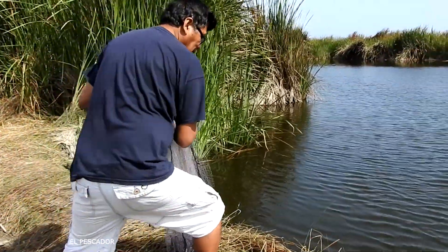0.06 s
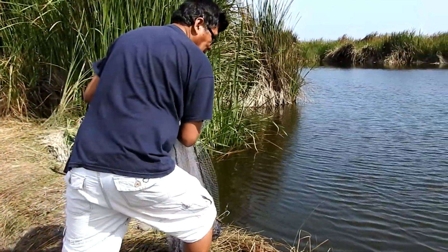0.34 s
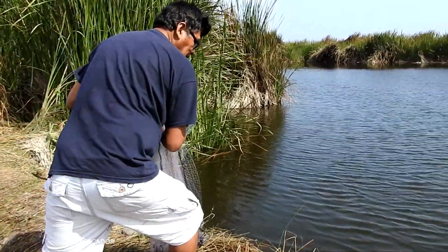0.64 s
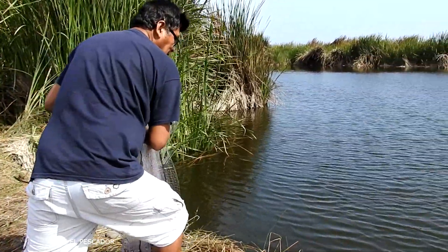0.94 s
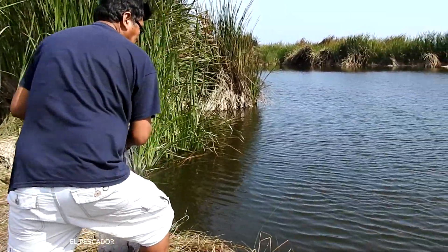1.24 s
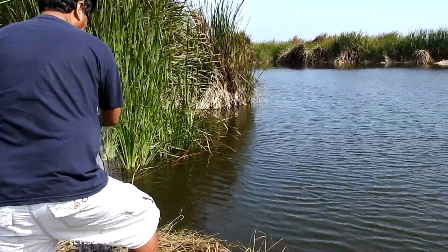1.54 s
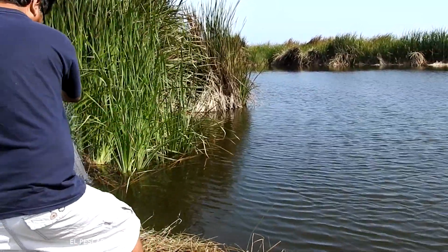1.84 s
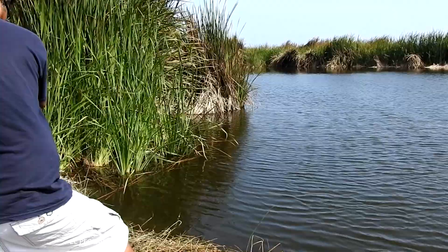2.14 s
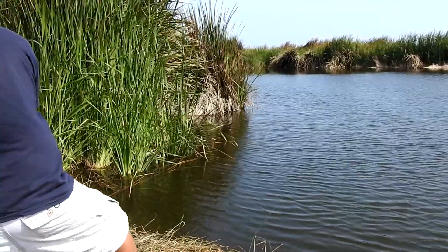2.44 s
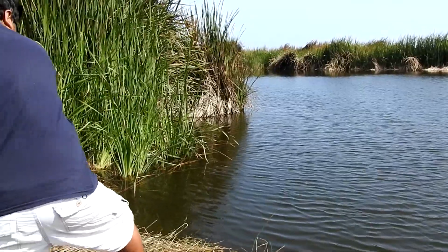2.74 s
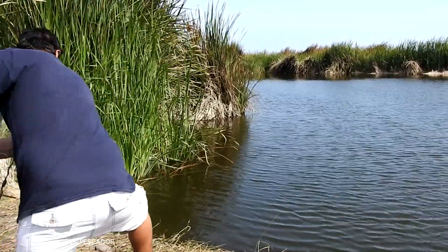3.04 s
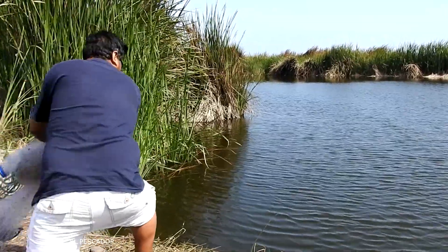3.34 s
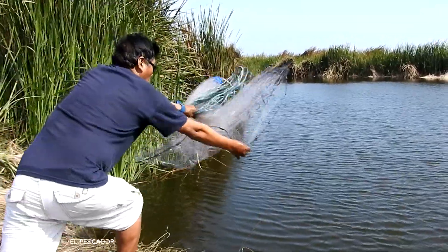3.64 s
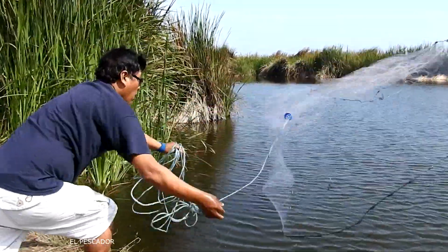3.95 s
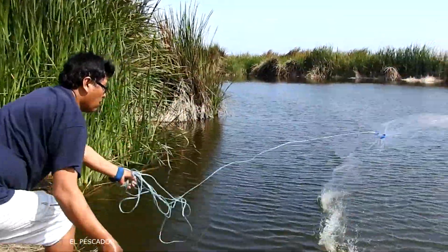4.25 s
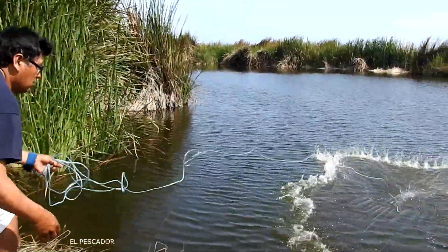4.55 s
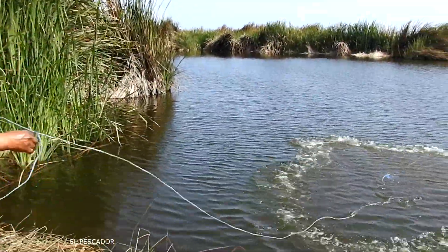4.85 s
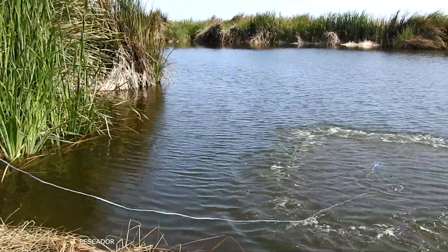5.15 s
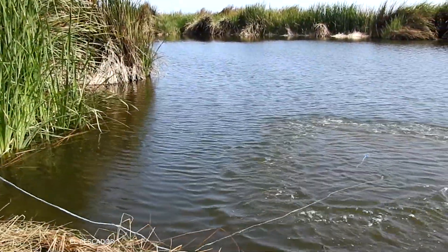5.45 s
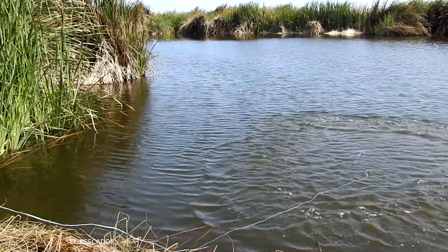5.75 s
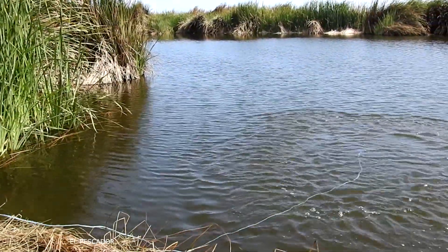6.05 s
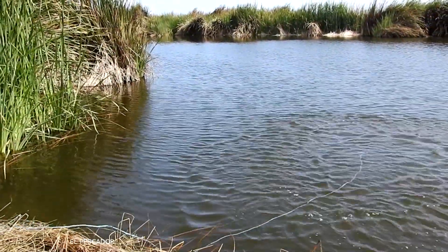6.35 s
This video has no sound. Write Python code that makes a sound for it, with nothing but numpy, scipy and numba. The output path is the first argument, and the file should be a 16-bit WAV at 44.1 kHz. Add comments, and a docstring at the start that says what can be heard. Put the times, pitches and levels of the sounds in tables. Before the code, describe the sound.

Soft wind and ripples outdoors, then a thrown fishing net hisses and hits the water with one broad, bubbling splash.

```python
"""On a reedy lagoon bank a fisherman shifts his feet in dry grass; lead sinkers knock together.
Near 3.4 s he swings a cast net, cloth rubbing, and the mesh hisses through the air.
From 4.3 s the ring of sinkers tears into the water, air cavities plop and gurgle, spray rains back.
Foam fizzes out and his feet scuff again. Throughout, reeds rustle, ripples murmur
and gusts rumble on the two microphone ports."""
import sys
import numpy as np
from scipy import signal
from scipy.fft import rfft, irfft, next_fast_len
from scipy.io import wavfile
from scipy.ndimage import uniform_filter1d, map_coordinates
from numba import njit

SR = 44100
rng = np.random.default_rng(int(sys.argv[2]) if len(sys.argv) > 2 else 0)


def master_out(mix):
    """Clip the mix to full scale and print it as 16-bit PCM to the path in sys.argv[1]."""
    frames = np.transpose(np.atleast_2d(mix))
    ceiling = np.clip(frames, -1, 1)
    pcm = np.round(ceiling * 32767).astype(np.int16)
    wavfile.write(sys.argv[1], SR, pcm)


N = 281799
TIME = np.arange(N) / SR

# Stretches of lead line hitting the water. Each row: start in seconds, level in dB, treble offset in dB.
SINKER_HITS = [(4.279, -45.5, 21.5), (4.309, -37.5, 11.5), (4.342, -29, 6), (4.36, -20, -2.5),
               (4.384, -22.5, 9), (4.42, -23.5, 0), (4.465, -25, -15), (4.502, -22, 5.5),
               (4.581, -22.5, 1.5), (4.595, -20, 4), (4.624, -30, 13), (4.666, -21, 2.5), (4.708, -30.5, 2)]
# Large air cavities pinching off. Each row: start in seconds, pitch in Hz, level in dB.
CAVITIES = [(4.367, 805, -15), (4.416, 335, -22.5), (4.422, 647, -13), (4.428, 264, -21), (4.467, 805, -20),
            (4.511, 685, -15), (4.527, 603, -10.5), (4.546, 673, -15.5), (4.579, 678, -14.5),
            (4.581, 254, -18), (4.603, 345, -16), (4.622, 619, -12.5), (4.65, 250, -15.5),
            (4.679, 668, -14), (4.682, 457, -15), (4.713, 536, -16), (4.742, 576, -12)]
# Ticks of straw, sinkers and drops. Each row: start in seconds, level in dB, pitch in Hz.
CONTACTS = [(.496, -32, 5500), (3.947, -21, 6470), (4.2914, -19, 3370), (4.303, -17, 5300),
            (4.376, -4.5, 1680), (4.505, -8, 3820), (4.515, -10, 5130), (4.671, -3, 5600),
            (5.036, -24, 5970), (5.135, -20, 5440), (5.341, -26, 6500), (5.415, -32, 1560),
            (5.434, -25, 6540)]
# Net in the air. Each row: time in seconds, level in dB, thread pitch in Hz.
NET_FLIGHT = [(3.56, -59.5, 4293), (3.73, -48, 5387), (3.88, -45, 5450), (3.96, -42, 5750),
              (4.13, -48.5, 5200), (4.26, -49, 4460)]
# Feet in dry grass. Each row: centre in seconds, half-width in seconds, level in dB.
FOOT_SCUFFS = [(0.41, 0.0088, -47), (0.4257, 0.0035, -41), (0.44, 0.011, -44), (0.472, 0.028, -54),
               (6.32, 0.018, -46), (6.355, 0.012, -45.5)]
# Sinker on sinker. Each row: start in seconds, level in dB, pitch in Hz.
SINKER_KNOCKS = [(.4255, -34, 1001), (1.02, -41, 990), (3.599, -36, 656)]
# Gusts. Each row: start and length in seconds, then level, left minus right and upper-bass offset in dB.
PORT_GUSTS = [(0.018, 0.05, -30.5, 5, -9), (0.258, 0.18, -34, 2, 2.5), (0.491, 0.057, -23.5, 4, -6),
              (0.578, 0.12, -28.5, 11, 0), (0.713, 0.074, -21.5, 22, -9), (1.8, 0.04, -30.5, 10, -3),
              (1.926, 0.1, -37.5, -15, -4), (2.548, 0.14, -36.5, 1, -4), (2.936, 0.093, -36.5, -15, 0),
              (3.031, 0.11, -32, 4.5, -0.5), (3.217, 0.031, -34, 10, 3), (4.592, .13, -36, -2, -7),
              (4.725, .15, -27.5, -11, -2), (4.93, 0.11, -27, 1, -1), (5.06, 0.15, -32, -2, -6),
              (5.281, 0.087, -25.5, -5, -0.5), (5.393, 0.074, -32.5, -2.5, 5.5), (5.598, .14, -31, 9, 7),
              (5.802, 0.086, -32, 5, 0), (5.895, 0.096, -18, 1.5, 1), (6.038, .17, -23, 3.5, -3),
              (6.312, 0.033, -20.5, 6, 1.5)]
# Swell of reeds and ripples. Each row: time in seconds, gain in dB.
SHORE_SWELL = [(0, .6), (1.2, 0.13), (2.15, -0.3), (2.7, 0.9), (3.3, 0.6), (5.6, 0.2), (6.39, 1)]

# Source spectra. Each row: frequency in Hz, relative density in dB.
IMPACT_SPECTRUM = [(120, -42), (200, -11), (270, 3.5), (400, -2), (700, 5), (1100, 0.5), (1380, -4),
                   (1650, 2.5), (2500, -2.5), (3500, -9), (5500, -7), (6700, -11), (8200, -21.5),
                   (15000, -55)]
SPRAY_SPECTRUM = [(250, -19), (420, -12.5), (600, -2.5), (920, 1.5), (1250, -2), (1650, 0), (2400, -4.5),
                  (3500, -9), (5800, -6.5), (6800, -11), (8200, -20.5), (11000, -37), (15000, -59)]
FOAM_SPECTRUM = [(300, -13), (1500, -8), (3500, -6), (5000, 0), (6300, 1), (7200, -3.5), (9000, -14),
                 (14000, -39)]
THREAD_SPECTRUM = [(300, -6.5), (1200, -6), (2300, -11), (3300, -6.5), (4500, -2), (5800, 0), (6800, -4),
                   (8500, -15.5), (12000, -35)]  # at top speed
GRASS_SPECTRUM = [(300, -9), (650, -18), (850, 5), (1150, 6), (1600, -6), (2300, 2), (3000, -4),
                  (4500, -3.5), (6800, -6.5), (9000, -22), (15000, -38)]
CLOTH_SPECTRUM = [(300, -12), (500, 3), (900, -4), (1500, 3), (2500, -7), (4500, -12), (6500, -7),
                  (8500, -18), (15000, -40)]
EDDY_SPECTRUM = [(15, -36), (28, -31), (42, -6.5), (62, -0.5), (95, 0), (130, -6), (190, -11), (270, -32.5),
                 (400, -35.5), (800, -76)]
SHORE_SPECTRUM = [(100, 7.5), (210, 6), (300, 0.5), (420, -6), (520, -3), (650, -1.5), (800, -5.5),
                  (880, -4.5), (940, 0.5), (1010, -7), (1250, -7), (2000, -11.5), (3400, -17),
                  (4300, -15.5), (6200, -16), (8000, -26.5), (10500, -32.5), (15500, -37)]

# Stereo widths. Each row: frequency in Hz, side relative to mid in dB.
NARROW = [(300, -30), (700, -15.5), (1300, -13.5), (2400, -12), (4400, -10.5), (8100, -3.5), (14000, 0)]
WIDE = [(200, -22), (600, -11.5), (1300, -10), (2400, -8), (4400, -1.5), (5600, 1.5), (8000, 2.5),
        (12000, -0.5)]


def impact():
    """Each stretch of sinkers tears the surface: a short burst of crackles and trapped bubbles."""
    crackle = unit(grains(cycles=5, scatter_db=3, count=60000))
    bubbles = unit(grains(cycles=41, scatter_db=-0.5, count=16000, glide=0.08))
    body, fizz = split(stereo(crackle + undb(-6) * bubbles, IMPACT_SPECTRUM, NARROW), hz=3900)
    body_power, fizz_power = np.zeros(N), np.zeros(N)
    for start_s, db, treble_db in SINKER_HITS:
        power = (undb(db) * envelope(start_s, attack_s=0.0018, length_s=0, release_s=0.063)) ** 2
        body_power += power
        fizz_power += power * undb(2 * treble_db)
    return body * np.sqrt(body_power) + fizz * np.sqrt(fizz_power)


def plops():
    """Cavities swell into their ring as they close, rising in pitch on their way to the surface."""
    start_s, hz, db = np.transpose(CAVITIES)
    pan = rng.uniform(-0.1, 0.19, len(hz))
    t60_s = np.full(len(hz), 0.074)
    tone = rings(start_s, hz, t60_s, undb(db), pan, glide=0.076)
    onset = rings(start_s, hz, 0.091 * t60_s, undb(db), pan, glide=0.)
    return left_right(*(tone - onset))  # subtraction rounds the attack


def gurgle():
    """Small cavities close while the sinkers go under."""
    sinking = envelope(start_s=4.36, attack_s=0.012, length_s=0.354, release_s=0.025)
    return sinking * single_bubbles(hz=477, spread_oct=0.55, t60_s=0.07, db=-26.5, scatter_db=5, count=300)


def spray():
    """Thrown-up drops patter back, fading; heavier ones each trap a chirping bubble."""
    start_s, sag_db_per_s = 4.327, 8
    sag = undb(-sag_db_per_s * np.maximum(TIME - start_s, 0))
    falling = sag * envelope(start_s, attack_s=0.15, length_s=0.75, release_s=0.13)
    patter = unit(grains(cycles=2.7, scatter_db=-1, count=36000))
    bubbles = unit(grains(cycles=80, scatter_db=3, count=12000, glide=0.36))
    body, fizz = split(stereo(patter + undb(-1) * bubbles, SPRAY_SPECTRUM, NARROW), hz=3460)
    drips = single_bubbles(hz=1202, spread_oct=0.45, t60_s=0.05, db=-25, scatter_db=5.5, count=200)
    return falling * (undb(-25) * (body + undb(1.8) * fizz) + drips)


def ticks():
    """Single contacts ring for only a few cycles."""
    start_s, db, hz = np.transpose(CONTACTS)
    cycles = 13
    pan = rng.uniform(-0.27, 0.37, len(hz))
    clicks = left_right(*rings(start_s, hz, cycles / hz, undb(db), pan, glide=0.05))
    return split(clicks, hz=7900)[0]


def foam():
    """Tiny bubbles keep bursting where the net sank."""
    bursting = undb(-51) * envelope(start_s=4.66, attack_s=0.18, length_s=0.65, release_s=0.84)
    return bursting * stereo(grains(cycles=5.2, scatter_db=-2.5, count=30000), FOAM_SPECTRUM, NARROW)


def flying_net():
    """Threads shed vortices at a pitch that follows their speed, a little to the left."""
    db, hz = curves(NET_FLIGHT)
    hiss = stereo(rng.standard_normal((2, N)), THREAD_SPECTRUM, NARROW)
    read_index = np.cumsum(hz / hz.max())  # slower read, lower pitch
    gliding = np.array([map_coordinates(channel, [read_index], order=3) for channel in hiss])
    aloft = envelope(start_s=3.48, attack_s=0.037, length_s=0.87, release_s=0.037)
    return gliding * aloft * undb(db + 1.26 * walk(rate_hz=60)) * undb([[2.1], [-2.1]])


def fisherman():
    """Dry stalks crackle under his shoes; shirt and bundled net rub most at mid-swing."""
    scuff_power = sum(undb(2 * db) * bell(centre_s, width_s) for centre_s, width_s, db in FOOT_SCUFFS)
    stalks = stereo(grains(cycles=2.1, scatter_db=1, count=30000), GRASS_SPECTRUM, NARROW)
    rub = stereo(rng.standard_normal((2, N)), CLOTH_SPECTRUM, WIDE)
    swing = undb(-46.5) * bell(centre_s=3.422, width_s=0.11)
    return np.sqrt(scuff_power) * stalks + swing * rub


def knocks():
    """Lead on lead: a dull tone with one overtone, centred."""
    start_s, db, hz = np.transpose(SINKER_KNOCKS)
    t60_s, pan = np.full(len(hz), 0.026), np.zeros(len(hz))
    tone = rings(start_s, hz, t60_s, undb(db), pan, glide=0.)
    overtone = rings(start_s, 2.2 * hz, t60_s, undb(db - 6.5), pan, glide=0.)
    return (tone + overtone)[0]


def wind():
    """Eddies buffet each port separately; gusts rise out of a light breeze and lean to one side."""
    eddies = colour(rng.standard_normal((2, N)), EDDY_SPECTRUM)
    eddies /= np.sqrt(uniform_filter1d(eddies ** 2, size=2600))  # flatten the noise's own swells
    deep, upper = split(eddies, hz=161)
    breeze_db = -42 + 3.5 * walk(rate_hz=12)
    deep_power = upper_power = undb(breeze_db) ** 2
    for start_s, length_s, db, lean_db, upper_db in PORT_GUSTS:
        balance = unit(undb([[lean_db / 2], [-lean_db / 2]]))
        gust = envelope(start_s, attack_s=0.0068, length_s=length_s, release_s=0.028)
        power = (undb(db) * balance * gust) ** 2
        deep_power = deep_power + power
        upper_power = upper_power + power * undb(2 * upper_db)
    rumble = deep * np.sqrt(deep_power) + upper * np.sqrt(upper_power)
    return split(rumble, hz=15)[1]  # microphone low cut


def shore():
    """Ripples murmur and reeds hiss, wavering a little."""
    ripples, reeds = split(stereo(rng.standard_normal((2, N)), SHORE_SPECTRUM, WIDE), hz=3800)
    ripples = ripples * undb(0.5 * walk(rate_hz=9.2))
    reeds = reeds * undb(0.5 * walk(rate_hz=4.94))
    return undb(-45 + curves(SHORE_SWELL)[0]) * (ripples + reeds)


def single_bubbles(hz, spread_oct, t60_s, db, scatter_db, count):
    """Upward-chirping bubbles around one pitch, spread over the whole scene; left and right."""
    when, where = rng.random((count, 2)).T
    pitch, size = np.clip(rng.standard_normal((count, 2)).T, -2, 2)
    start_s = (np.arange(count) + when) / count * N / SR
    bubble_hz = hz * 2 ** (spread_oct * pitch)
    gain = undb(db + scatter_db * size)
    pan = 0.2 * (2 * where - 1)
    return left_right(*rings(start_s, bubble_hz, np.full(count, t60_s), gain, pan, glide=0.09))


def grains(cycles, scatter_db, count, glide=0.):
    """Steady white cloud of tiny random rings; mid and side."""
    when, pitch, life, size, where = rng.random((count, 5)).T
    hz = 150 + 15000 * pitch ** 2
    whiten = hz ** 0.75
    t60_s = cycles * (0.5 + life) / hz
    gain = whiten * undb(-scatter_db * np.log(np.maximum(size, 0.02)))
    pan = np.sqrt(3) * (2 * where - 1)
    return rings(when * N / SR, hz, t60_s, gain, pan, glide)


@njit
def rings(start_s, hz, t60_s, gain, pan, glide):
    """Damped sines as mid and side; each rises in pitch by the fraction glide as it dies."""
    out = np.zeros((2, N))
    for k in range(len(start_s)):
        first, length = int(start_s[k] * SR), int(t60_s[k] * SR) + 2
        pole = np.exp(2j * np.pi * hz[k] / SR - np.log(1000.) / length)
        bend = np.exp(2j * np.pi * hz[k] * glide / SR / length)
        phasor = gain[k] + 0j
        for i in range(max(first, 0), min(first + length, N)):
            phasor, pole = phasor * pole, pole * bend
            out[0, i] += phasor.imag
            out[1, i] += phasor.imag * pan[k]
    return out


def envelope(start_s, attack_s, length_s, release_s):
    """Exponential rise; decay begins length_s after the start."""
    age_s = np.maximum(TIME - start_s, 0)
    return (1 - np.exp(-age_s / attack_s)) * np.exp(-np.maximum(age_s - length_s, 0) / release_s)


def bell(centre_s, width_s):
    """Gaussian swell, peak 1."""
    return np.exp(-((TIME - centre_s) / width_s) ** 2)


def curves(table):
    """Table columns, interpolated linearly in time."""
    time_s, *columns = np.transpose(table)
    return [np.interp(TIME, time_s, column) for column in columns]


def walk(rate_hz):
    """Random steps, smoothed twice; rms 1."""
    hold = int(SR / rate_hz)
    steps = np.repeat(rng.standard_normal(N // hold + 1), hold)
    return unit(uniform_filter1d(uniform_filter1d(steps, hold), hold)[:N])


def stereo(pair, spectrum, width):
    """Colour a mid and side pair; return left and right with the mid at rms 1."""
    mid, side = colour(pair, spectrum)
    return left_right(mid, colour(side, width)) / np.std(mid)


def left_right(mid, side):
    """Mid and side to left and right."""
    return np.array([mid + side, mid - side])


def colour(x, spectrum):
    """Filter by (Hz, dB) points on a log-frequency axis."""
    size = next_fast_len(N)
    hz, db = np.transpose(spectrum)
    bin_hz = np.maximum(np.fft.rfftfreq(size, 1 / SR), 1)
    gain = undb(np.interp(np.log(bin_hz), np.log(hz), db))
    return irfft(rfft(x, size) * gain, size)[..., :N]


def split(x, hz):
    """Bands below and above hz."""
    low = signal.sosfiltfilt(signal.butter(2, hz, fs=SR, output="sos"), x)
    return low, x - low


def unit(x):
    """Scale to rms 1."""
    return x / np.sqrt(np.mean(x ** 2))


def undb(db):
    """Decibels to gain."""
    return 10 ** (np.asarray(db) / 20)


def scene():
    """Sum of all sources; the net lands a little to the right."""
    splash = (impact() + plops() + spray() + foam() + ticks() + gurgle()) * undb([[-0.6], [0.6]])
    return wind() + shore() + fisherman() + knocks() + flying_net() + splash


def record(dry):
    """The camera cuts the top treble."""
    cutoff_hz = 15400
    return signal.sosfilt(signal.ellip(12, 0.2, 80, cutoff_hz, fs=SR, output="sos"), dry)


dry = scene()
out = record(dry)
master_out(out)
```